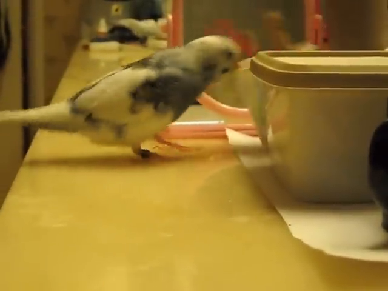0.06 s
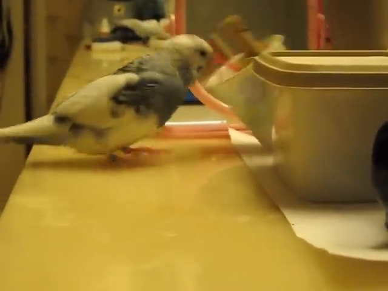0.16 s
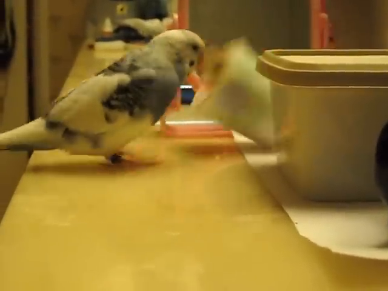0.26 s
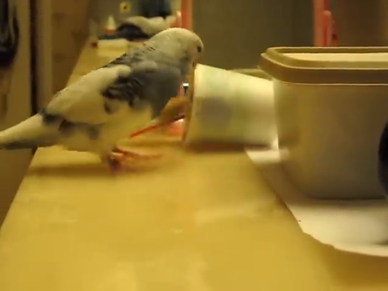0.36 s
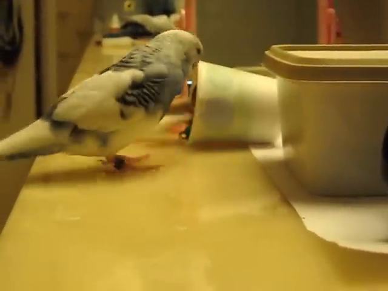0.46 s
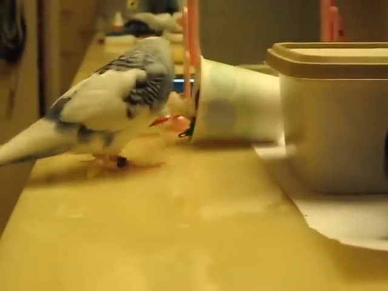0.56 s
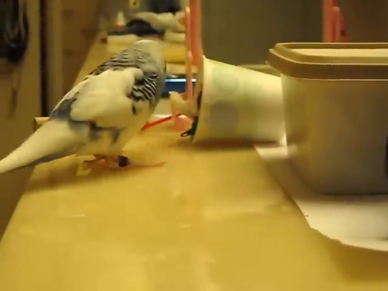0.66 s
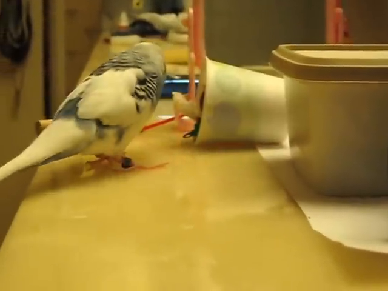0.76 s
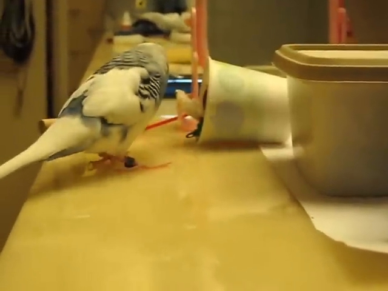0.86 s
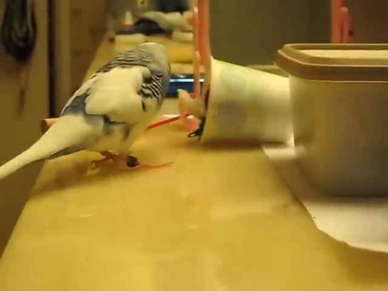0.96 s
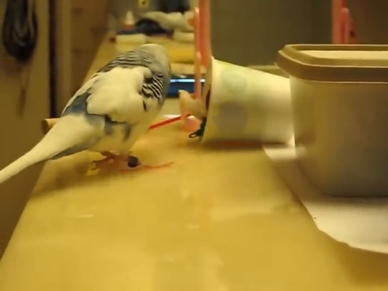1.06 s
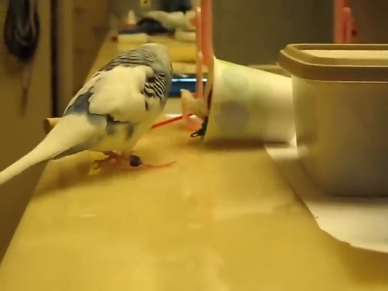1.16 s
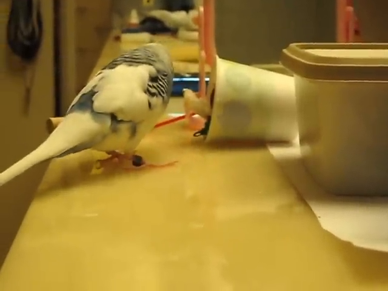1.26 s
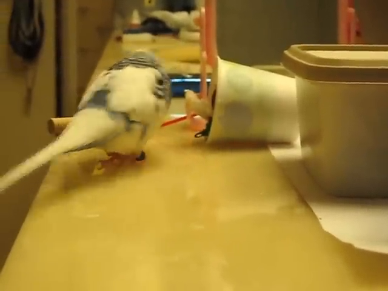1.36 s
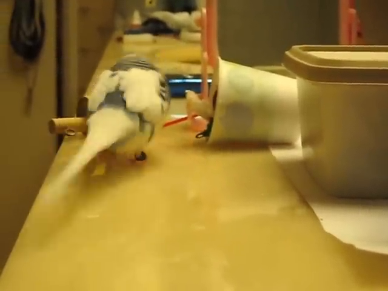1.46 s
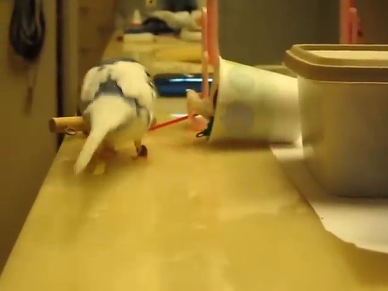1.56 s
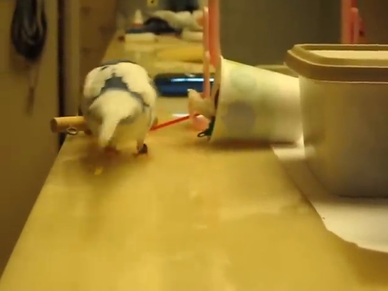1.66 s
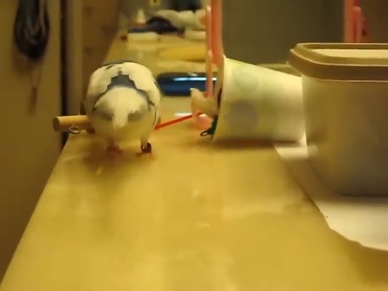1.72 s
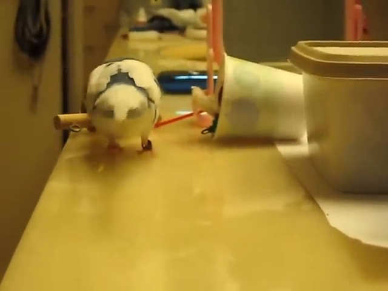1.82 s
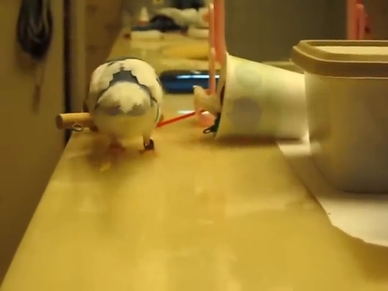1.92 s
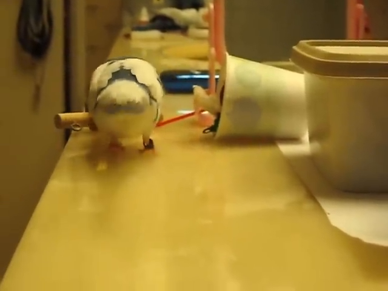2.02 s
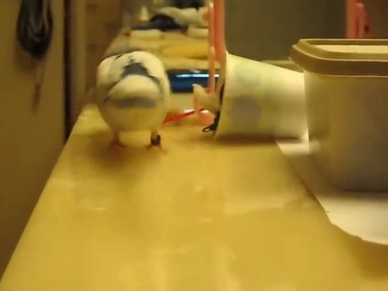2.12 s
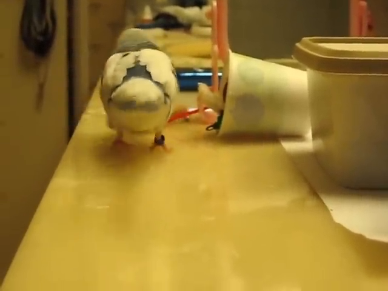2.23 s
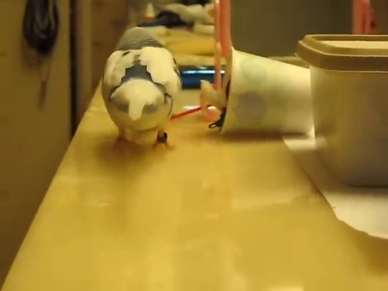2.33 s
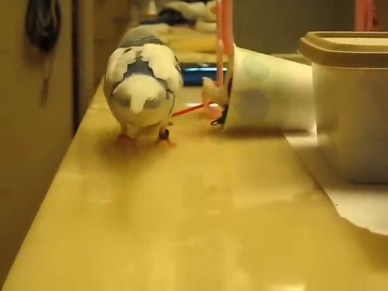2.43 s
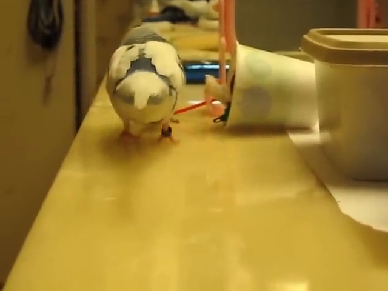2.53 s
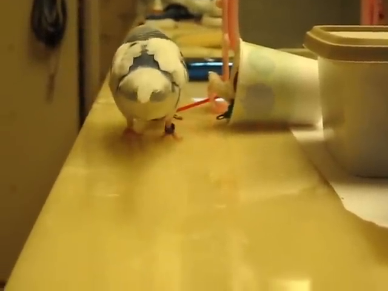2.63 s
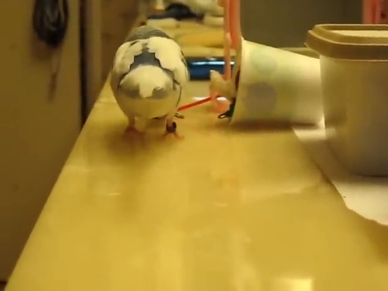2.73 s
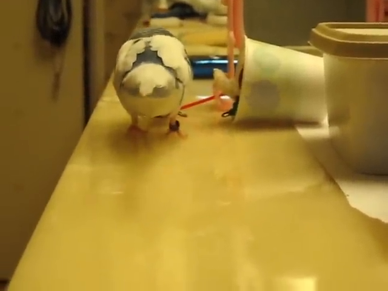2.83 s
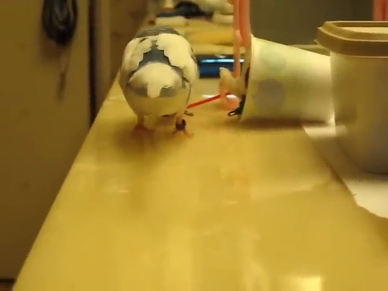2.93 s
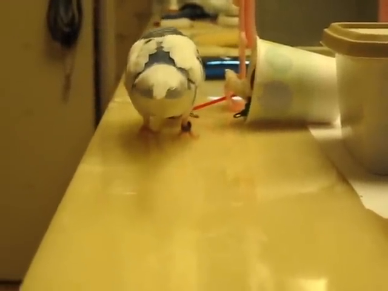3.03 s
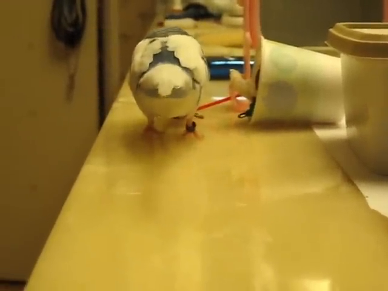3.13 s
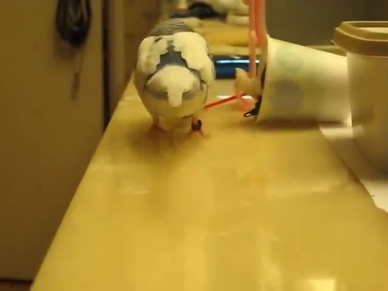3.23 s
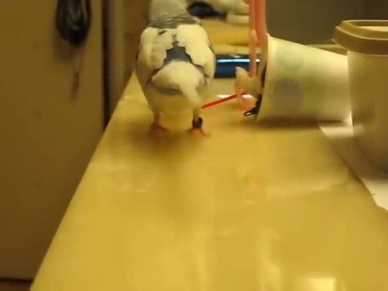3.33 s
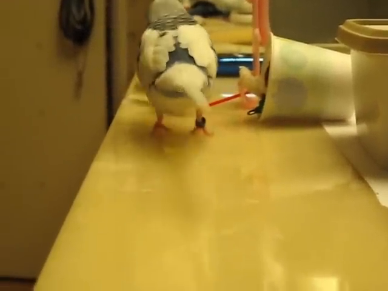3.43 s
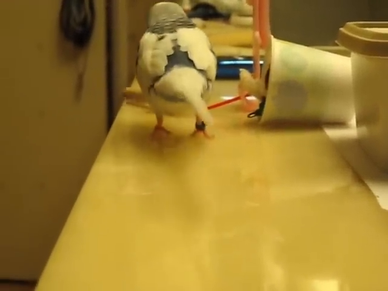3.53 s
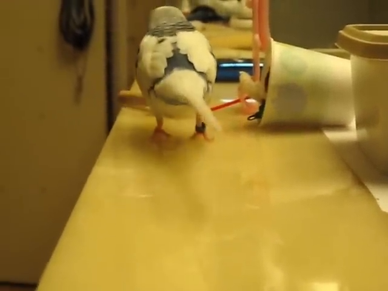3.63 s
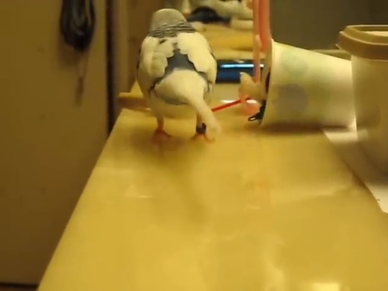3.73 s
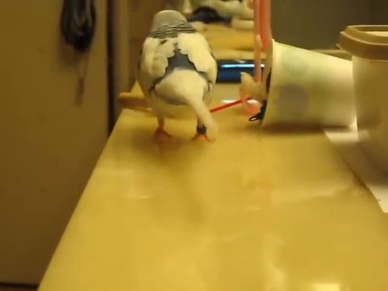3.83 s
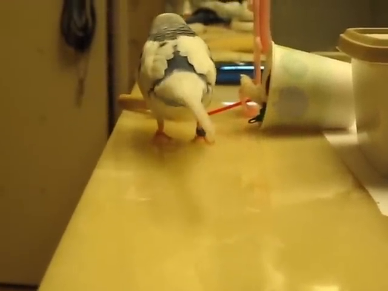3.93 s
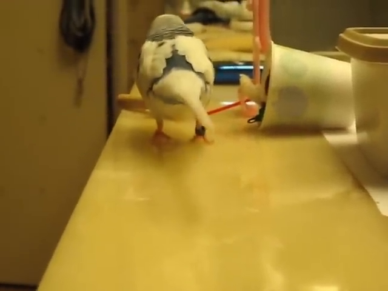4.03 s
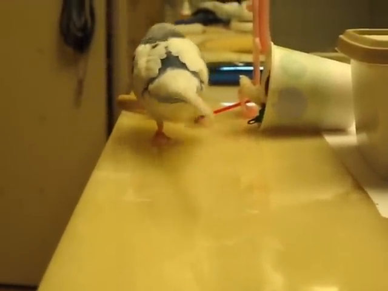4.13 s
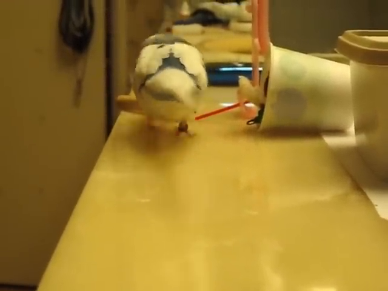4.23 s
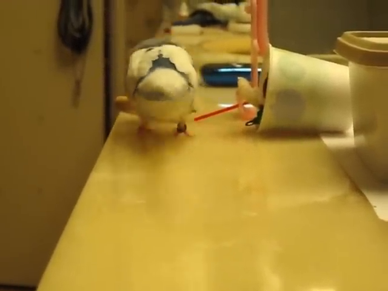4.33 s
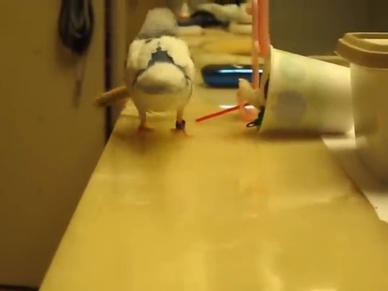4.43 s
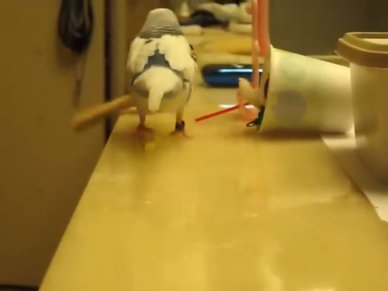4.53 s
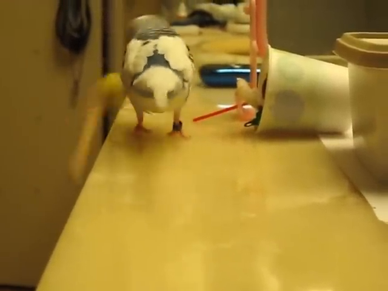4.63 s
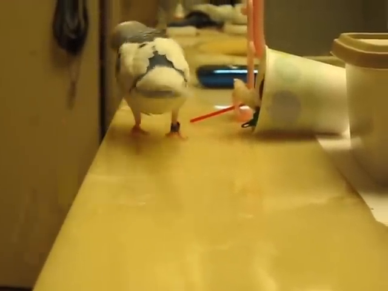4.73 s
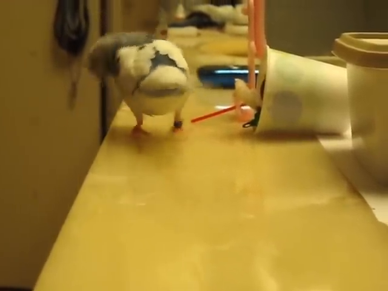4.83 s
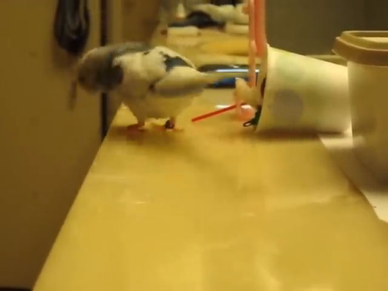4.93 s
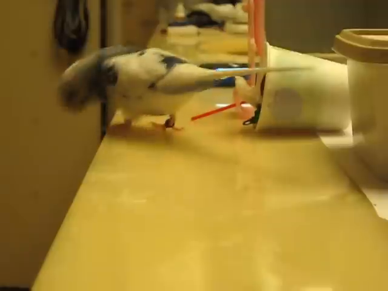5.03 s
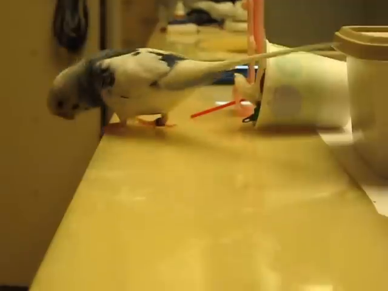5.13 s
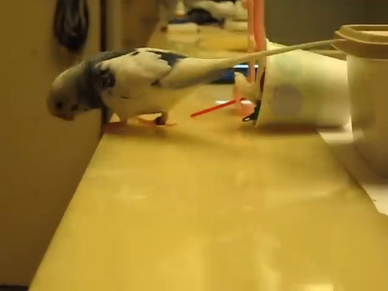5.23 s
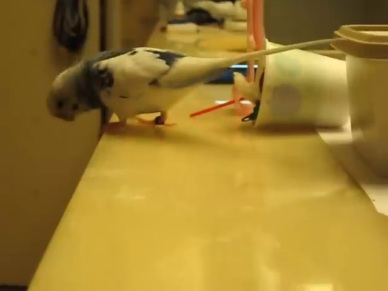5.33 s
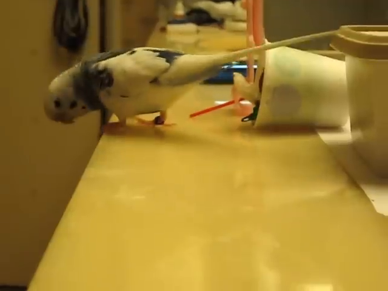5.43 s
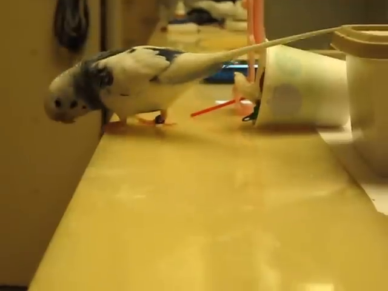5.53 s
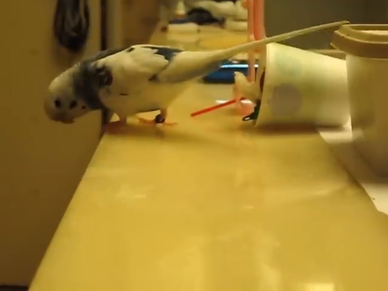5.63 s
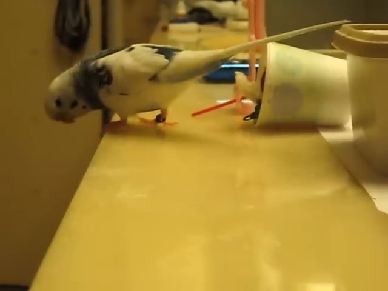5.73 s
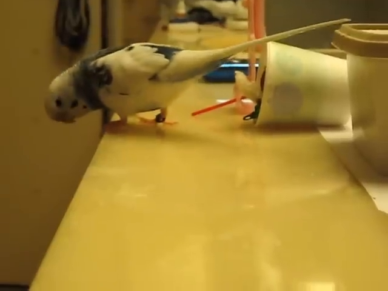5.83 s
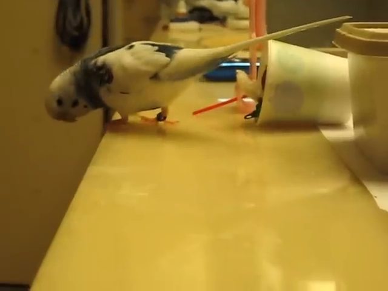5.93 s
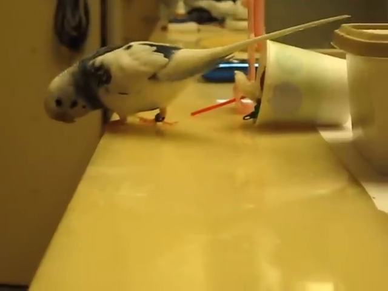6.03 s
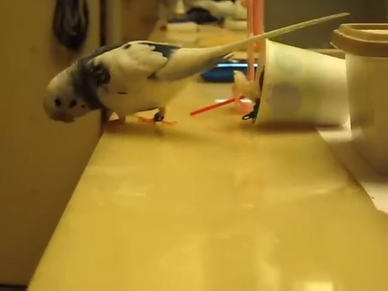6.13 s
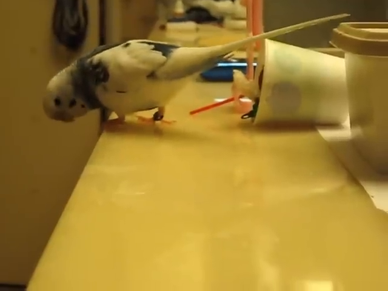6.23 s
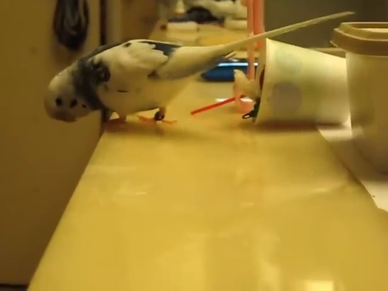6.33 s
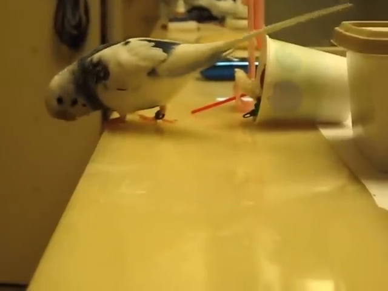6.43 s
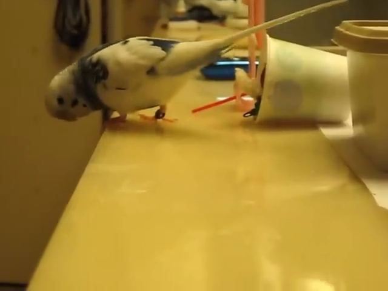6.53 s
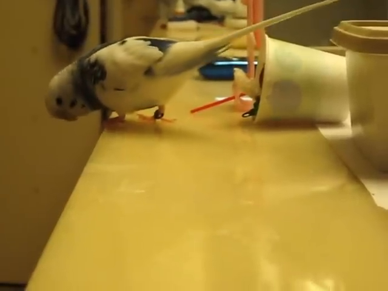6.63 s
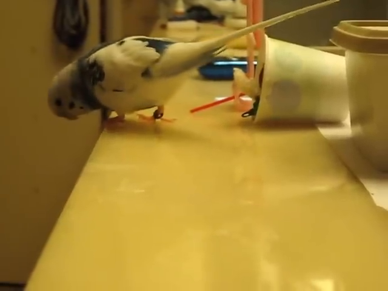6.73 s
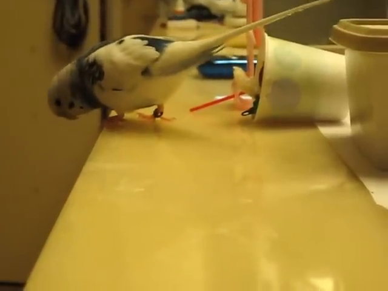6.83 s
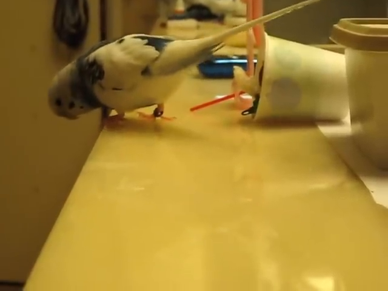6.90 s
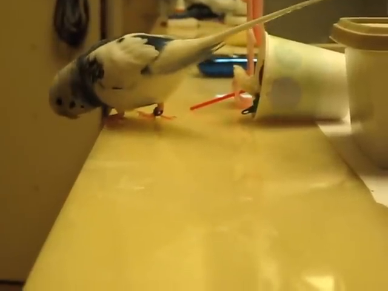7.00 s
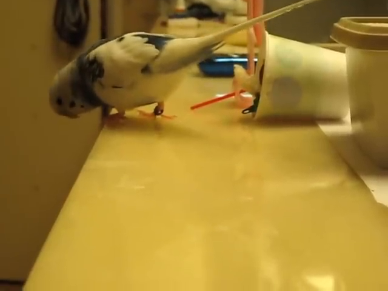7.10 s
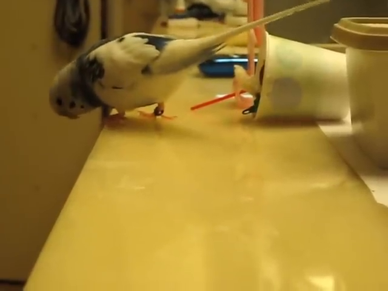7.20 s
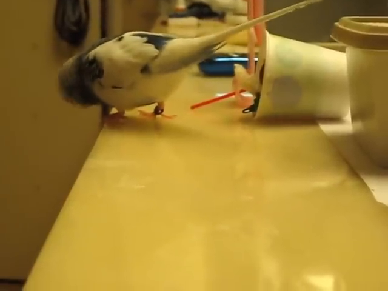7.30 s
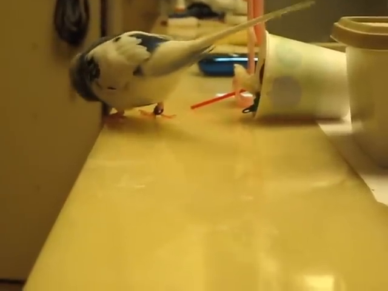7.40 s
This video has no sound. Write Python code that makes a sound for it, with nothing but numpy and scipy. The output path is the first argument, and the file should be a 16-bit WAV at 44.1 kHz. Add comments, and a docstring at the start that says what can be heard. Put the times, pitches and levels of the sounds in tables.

```python
"""On a kitchen counter, a budgie tips a paper cup of toys, drags a wooden peg with a jingle bell
and drops it over the edge. Decaying sines make the bell and a metal trinket ring; peg, cup and claws knock
with short clicks that ring the wood, and things slide, roll and squeak. Tail feathers brush across
the cup as shaped noise; a small microphone hisses under a faint mains hum."""
import sys
import numpy as np
from scipy import signal
from scipy.fft import rfft, irfft
from scipy.io import wavfile
from scipy.ndimage import uniform_filter1d

SR = 44100
rng = np.random.default_rng(int(sys.argv[2]) if len(sys.argv) > 2 else 0)


def boost_factor(decibels):
    """Convert a level in decibels to a linear amplitude factor."""
    exponent = np.asarray(decibels, float) / 20
    return 10 ** exponent


def store_wav(level_fs):
    """Save 16-bit WAV to argv[1]."""
    pcm = np.round(np.clip(np.atleast_2d(level_fs), -1, 1) * 32767)
    wavfile.write(sys.argv[1], SR, pcm.T.astype(np.int16))


N = 328986
TIME = np.arange(N) / SR

# Ringing tones of worktop, peg and cup: pitch_hz, level_db, t60_s (time to fade by 60 dB)
WOOD_MODES = [(780, -3, 0.061), (860, -5.5, 0.13), (980, -4.5, 0.061), (1214.5, 0.5, 0.042),
              (1522, -2.5, 0.026), (1750, -8, 0.16), (2150, -5, 0.16), (2430, -9, 0.1), (2680, -3.5, 0.057),
              (3000, 1, 0.024), (3630, -11, 0.016), (4270, -18, 0.045)]


def unit(x):
    """Scale to rms 1."""
    return x / np.sqrt(np.mean(x ** 2))


def colour(x, points):
    """Filter by (Hz, dB) points joined on a log-frequency axis; rms 1."""
    hz, db = np.transpose(points)
    bins = np.fft.rfftfreq(N, 1 / SR) + 1  # the 1 avoids log(0)
    gain = boost_factor(np.interp(np.log(bins), np.log(hz), db))
    return unit(irfft(rfft(x) * gain, N))


def band(x, lo_hz, hi_hz, order=2):
    """Butterworth band-pass."""
    return signal.sosfilt(signal.butter(order, [lo_hz, hi_hz], "band", fs=SR, output="sos"), x)


def mode(x, hz, t60):
    """One decaying sine for every impulse in x."""
    r = np.exp(-np.log(1000) / (t60 * SR))
    w = 2 * np.pi * hz / SR
    return signal.lfilter([0, np.sin(w)], [1, -2 * r * np.cos(w), r * r], x)


def train(times, sizes):
    """Impulses of the given sizes at the given seconds."""
    out = np.zeros(N)
    np.add.at(out, (np.asarray(times) * SR).astype(int), sizes)
    return out


def grains(rate, spread_db):
    """Random tiny impacts, rate per second, a few much stronger than the rest; rms 1."""
    hit = rng.random(N) < rate / SR
    strength = boost_factor(spread_db * np.minimum(rng.exponential(size=N), 4.0))
    return unit(hit * strength * rng.choice([-1, 1], N))


def walk(rate):
    """Smooth random wander, faster for a higher rate; rms 1."""
    k = int(SR / rate)
    return unit(uniform_filter1d(uniform_filter1d(rng.standard_normal(N), k), k))


def swell(s, held, db, rise, fall):
    """Gain that rises to db at s, holds and falls, at steady dB per second."""
    below_db = np.maximum(rise * (s - TIME), fall * (TIME - s - held))
    return boost_factor(db - np.maximum(0, below_db))


def hum():
    """Mains hum from an appliance: steady tones, each made to waver by narrow noise around it."""
    # Tones of the hum: pitch_hz, level_db, width_hz of the noise
    hum_tones = [(114, -80, 8), (178, -87.5, 8), (240, -67, 5), (358.6, -71, 6), (418, -81, 10),
                 (550, -83, 10), (605, -83.5, 6), (734, -79.5, 6)]
    out = 0
    for hz, db, width in hum_tones:
        noise = band(rng.standard_normal(N), hz - width / 2, hz + width / 2, order=1)
        waver = noise * .5 * np.sqrt(hz / width)
        out = out + boost_factor(db) * unit(waver + np.sin(2 * np.pi * hz * TIME))
    return out


def wood(push):
    """The worktop's modes; push(k) gives the force on mode k, and the contact is too soft for treble."""
    ring = sum(boost_factor(db) * mode(push(k), hz, t60) for k, (hz, db, t60) in enumerate(WOOD_MODES))
    return band(ring, 360, 4700)


def slides():
    """Sliding and rocking: dense small impacts ring the wood; the paper cup crackles above."""
    # Pushes along the worktop: start_s, held_s, level_db, crackle_db (relative to the level)
    pushes = [(.012, .012, -49, -3), (.08, 0.14, -57.5, -11), (0.406, 0.041, -37.5, 0),
              (0.466, 0.019, -35, 1.5), (0.531, 0.036, -42.5, -12), (.595, 0.024, -50, -11),
              (0.691, 0.033, -42.5, -11), (.81, 0.11, -51.5, -27), (.99, 0.032, -57, -30),
              (2.248, 0.036, -42.5, -16), (2.304, 0.031, -41, -21), (3.438, 0.008, -30, -14.5),
              (3.534, 0.039, -35.5, -17), (3.621, .11, -41, -8), (4.569, 0.065, -28.5, -25)]
    rise_db_per_s, fall_db_per_s = 20000, 231
    thuds = colour(grains(2500, 4.5), [(250, -14.5), (700, -7.5), (1500, -1.5), (2600, -11.0),
                                       (4500, -14), (8000, -45)])
    rumble = 0.66 * unit(wood(lambda k: grains(1500, 3.8))) + 0.59 * thuds
    crackle = colour(grains(4000, 8.1), [(2500, -26), (3800, 8), (7000, 1), (9000, -10), (16000, -11)])
    out = 0
    for s, held, db, crackle_db in pushes:
        gain = swell(s, held, db, rise_db_per_s, fall_db_per_s)
        out = out + gain * (rumble + boost_factor(crackle_db) * crackle)
    return boost_factor(0.76 * walk(76)) * out  # uneven in strength


def knocks():
    """A short pitched click with a rough tail, a broadband edge, and the wood ringing after."""
    # Knocks of peg, cup and claws: start_s, level_db, pitch_hz of the click, edge_db (relative)
    knock_list = [(0.0149, -29.5, 1620, -4), (0.0154, -31, 4300, -5), (0.0204, -34, 1900, -12),
                  (0.0806, -33, 1060, -10.5), (0.089, -31.5, 1170, -36), (0.1753, -41, 1610, -13),
                  (0.2045, -36.5, 2520, 0.5), (0.394, -30, 2050, -8), (0.4033, -14, 1750, -7.5),
                  (0.4034, -9.5, 4030, 0), (0.418, -20, 1250, -9), (0.467, -22.5, 2530, 1.5),
                  (0.4787, -21, 2200, -13), (0.4945, -18.5, 3600, 6), (0.495, -16, 11860, -4),
                  (0.529, -25, 3120, 7), (0.5299, -14.5, 12000, -5), (0.5927, -17.5, 2050, -26),
                  (0.6205, -19.5, 2350, -36), (0.626, -25.5, 2100, -36), (0.6313, -19.5, 1960, -40.5),
                  (0.6821, -15.5, 2130, -23), (0.701, -24, 3340, -14), (0.745, -19, 2470, -17),
                  (0.7543, -32, 2120, -33), (0.8243, -26.5, 2300, -15), (0.8504, -18, 2150, -30),
                  (0.883, -46, 1190, -36), (0.89, -33, 1440, -32), (0.9928, -34.5, 1750, -30),
                  (1.0212, -39, 1770, -21), (1.048, -49, 2150, -27), (1.064, -40.5, 2210, -25),
                  (1.0863, -41.5, 960, -26), (2.0715, -45, 3000, -20), (2.0946, -41, 2560, -9),
                  (2.2495, -28.5, 860, -30), (2.2502, -30, 3300, -15), (2.2513, -26, 2150, -9),
                  (2.264, -27, 910, -28), (2.2864, -27.5, 820, -25), (2.289, -32, 2700, -20),
                  (2.323, -38, 1250, -36), (3.3718, -51, 2430, 5), (3.435, -23.5, 1740, -21),
                  (3.4351, -16, 3550, -28), (3.4526, -23, 1460, -36), (3.4744, -27, 2770, -7),
                  (3.537, -29, 1150, -5), (3.5722, -24.5, 1800, -9), (3.6702, -23, 3850, -20),
                  (3.6711, -24, 1470, -30), (3.7607, -20, 2330, -24), (3.765, -18.5, 2430, -29),
                  (3.8539, -34.5, 2405, -39), (3.8818, -48, 2300, -23), (3.8924, -39, 1070, -24),
                  (3.993, -51, 2740, -25), (4.393, -40, 2360, -6), (4.5706, -12, 1670, -19),
                  (4.5698, -9.5, 3600, -31), (4.5887, -13, 2100, -30), (4.625, -19.5, 1220, -32),
                  (4.65, -27, 1610, -36), (4.686, -20.5, 1374, -25), (4.7196, -21, 1610, -32),
                  (4.7572, -28.5, 2620, -23), (4.7839, -27.5, 1470, -28), (4.785, -35, 3500, -20),
                  (4.7922, -33, 1570, -34), (4.81, -27.5, 1920, -22), (4.9164, -32, 2460, 6),
                  (5.0631, -24, 2000, -5), (5.128, -19, 2280, -13), (5.141, -20, 2510, -7),
                  (5.1806, -20, 1520, -15), (5.1808, -14.5, 2760, -20), (5.1936, -22, 2820, -8),
                  (5.2343, -16, 2400, -19), (5.2704, -24.5, 2160, -15), (5.2938, -32, 2090, -36),
                  (5.3687, -27, 2570, -24), (5.4535, -31.5, 1750, -25), (6.35, -47, 980, -22),
                  (6.37, -45, 5150, 8), (6.5119, -46.5, 860, -19), (6.5836, -34.5, 2330, -27),
                  (6.59, -34, 2630, -30), (6.5998, -40, 2200, -22), (6.9748, -51, 5450, 18.5),
                  (6.985, -46, 14300, -15), (6.993, -48, 13600, -12)]
    s, db, hz, edge_db = np.transpose(knock_list)
    over = db + 25  # dB above a middling knock
    # higher knocks fade sooner, harder ones slightly later
    base_t60 = 0.019 * (hz / 2000) ** -0.65 * boost_factor(0.01 * over)
    out, t = np.zeros(N + SR), np.arange(SR // 10) / SR
    chance = rng.standard_normal((len(s), len(t)))
    for k in range(len(s)):
        onset = np.sin(np.pi / 2 * np.minimum(t / 0.00049, 1)) ** 2
        fade = np.exp(-np.log(1000) * t / base_t60[k]) * onset
        rough = unit(band(chance[k], hz[k] / 1.21, hz[k] * 1.21))
        # the powers shorten the fade, more for the edge than for the click
        click = (np.sin(2 * np.pi * hz[k] * t) + 0.84 * rough) * fade ** 1.54
        hard = band(band(chance[k][::-1], 4400, 19845), 2200, 6600, order=1)
        edge = boost_factor(edge_db[k]) * unit(hard) * fade ** 1.95
        out[int(s[k] * SR):][:len(t)] += boost_factor(db[k]) * (click + edge)
    # each knock lands on another spot; hard ones ring relatively less
    spot = rng.standard_normal((len(s), len(WOOD_MODES)))
    ring_db = -47.5 + 0.64 * over

    def push(k):
        """Force of all knocks on one wood mode, with random share and sign."""
        return train(s, boost_factor(ring_db + 2.6 * spot[:, k]) * np.sign(spot[:, k - 1]))

    return out[:N] + wood(push)


def trinket():
    """A smaller metal trinket in the cup: two close low modes and one high one."""
    # Ringing tones: pitch_hz, level_db, t60_s
    trinket_modes = [(4300, -6, .09), (4370, -9, .06), (12700, -4, .15)]
    # Strikes: start_s, level_db, high_db (extra on the high mode)
    tinks = [(.1256, -44.5, -24), (0.203, -38, -22), (0.238, -42, -11), (.2524, -53, -11),
             (0.4197, -31, -6), (0.4313, -24, -1), (0.451, -37, -1)]
    s, db, high_db = np.transpose(tinks)
    out = 0
    for k, (hz, mode_db, t60) in enumerate(trinket_modes):
        strike_db = db + mode_db + high_db * (k == 2)
        out = out + mode(train(s, boost_factor(strike_db)), hz, t60)
    return out


def bell():
    """Each strike lands on another spot; the pellet skitters on and chokes the ring unevenly."""
    # Ringing tones of the jingle bell on the peg: pitch_hz, level_db, t60_s
    bell_modes = [(3486, -5.5, 0.048), (3850, -19, 0.087), (4754, -14.5, 0.064), (4974, -10, 0.15),
                  (6090, -20, 0.091), (6240, 1.5, 0.054), (6370, -26, 0.082), (6670, -11, 0.087),
                  (6600, -36, .04), (8830, -25.5, 0.097), (10760, -23.5, 0.081), (12960, -13.5, 0.085),
                  (13600, -19, 0.036), (13950, -10, 0.065), (14060, -21, 0.05), (14300, -14, 0.033)]
    # Pellet strikes: start_s, level_db, then extras low_db (two lowest modes),
    # middle_db (5 kHz mode), high_db (modes above 8 kHz)
    jingles = [(0.4675, -22.5, 3, -7, -6), (0.472, -34, 3, 6, -4), (0.4945, -21.5, -2, -1, -10),
               (0.5303, -27.5, 5, 3, -8), (0.7008, -27.5, 6.5, -3, -9), (0.733, -38.5, -14, -2, -3),
               (0.7726, -27, -3, 1, -7), (0.8047, -31.5, -5, -11, -3), (0.8144, -30, -4, 0, -8),
               (0.9312, -32, -6, -1, -10), (2.1031, -45.5, 3.5, 10, -18), (2.2162, -33, -3, -2, -6),
               (2.2246, -33.5, -7, 1, -15), (2.2672, -27.5, -16, -2, -12), (2.3116, -22, -0.5, -2, 1),
               (2.3267, -22.5, -7, -10, 0.5), (2.359, -25, 3, -3, 0.5), (2.3754, -23.5, -1, 5, -1),
               (2.39, -37, -15, 12, 8), (2.4779, -45, 1, 7, -11.5), (3.4356, -23, 4.5, 3, -15),
               (3.473, -26, 8, 11.5, 12), (3.5329, -19.5, -2, -3, 2), (3.5594, -39, 11, 17.5, 7),
               (3.6202, -17, -5, -21, -2.5), (3.6501, -25.5, -0.5, -5, 2), (3.7146, -18.5, -6.5, -14, -5),
               (3.7394, -30, -16, -13, 0.5), (3.7874, -34, -17, 0, -18), (4.424, -29.5, -7, -8, -4.5),
               (4.4397, -31.5, -22, -5, -11), (4.5186, -39.5, 0, -13, -19), (4.571, -33, 22, 3, 6),
               (4.581, -32, 4, 20, -16), (4.6298, -34, -8, 10, -15), (4.8861, -35.5, 10, 19, -3)]
    skitter_db, skitter_s = -28, 0.014  # the pellet rattling on after a strike
    s, db, low_db, middle_db, high_db = np.transpose(jingles)
    spot = rng.standard_normal((len(s), len(bell_modes)))
    fade = np.exp(-np.arange(SR // 10) / (skitter_s * SR))
    out = 0
    for k, (hz, mode_db, t60) in enumerate(bell_modes):
        extra_db = low_db if k < 2 else middle_db if k == 3 else high_db if k > 8 else 0
        size = boost_factor(db + extra_db)
        rattle_gain = signal.fftconvolve(train(s, size), fade)[:N]
        skitter = boost_factor(skitter_db) * grains(1200, 3.1) * rattle_gain
        strikes = train(s, size * boost_factor(0.73 * spot[:, k]))
        ring = mode(strikes + skitter, hz, t60)
        choke_db = 3.5 * (hz / 6000) ** .5 * walk(420)  # higher modes flicker more
        out = out + boost_factor(mode_db - 4.5 + choke_db) * ring
    # the metal tick of contact
    tick = band(train(s, boost_factor(db + high_db)), 5900, 15000, order=1)
    return out + boost_factor(1.0) * tick


def rolls():
    """Surface bumps keep one hollow resonance going; its pitch sags and wobbles with the point of contact."""
    # The cup and later the peg rolling away: start_s, held_s, level_db, pitch_hz, sag_hz_per_s
    roll_list = [(.89, 0.15, -55.5, 882, 392), (4.689, 0.121, -42.5, 1638, 1400)]
    edge_db_per_s, wobble_share, wobble_rate = 350, 0.049, 16
    out = 0
    for s, held, db, hz, sag in roll_list:
        pitch = (hz - sag * np.clip(TIME - s, 0, held)) * (1 + wobble_share * walk(wobble_rate))
        phase = 2 * np.pi * np.cumsum(pitch) / SR
        hollow = walk(290) * np.cos(phase) + walk(260) * np.sin(phase)
        out = out + swell(s, held, db, edge_db_per_s, edge_db_per_s) * hollow
    return out


def squeak():
    """Stick-slip as something rubs and comes to rest: a slightly unsteady stack of harmonics."""
    # Path of the squeak: time_s, pitch_hz, level_db
    squeak_path = [(.9, 690, -67), (.912, 681, -46), (.93, 694, -52), (.945, 774, -57), (.965, 702, -50),
                   (.975, 700, -74)]
    s, hz, db = np.transpose(squeak_path)
    pitch = np.interp(TIME, s, hz) * (1 + 0.0086 * walk(290))
    phase = 2 * np.pi * np.cumsum(pitch) / SR
    harmonics_db = [0.5, 1, 1, -5, -13]
    stack = sum(boost_factor(part_db) * np.sin(k * phase) for k, part_db in enumerate(harmonics_db, 1))
    return boost_factor(np.interp(TIME, s, db, left=-150, right=-150)) * stack


def feathers():
    """Tail feathers on paper: barbs catch and slip many thousand times a second, in uneven bursts."""
    # Loudness of the brushing: time_s, level_db
    strokes = [(4.805, -59), (4.83, -39.5), (4.9, -40.5), (4.912, -31.5), (4.99, -31), (5.02, -30.5),
               (5.055, -31.5), (5.09, -28), (5.16, -35.5), (5.2, -29.5), (5.29, -43.5), (5.32, -39.5),
               (5.37, -50), (5.43, -53), (5.52, -73)]
    # Tone colour of the brushing: pitch_hz, level_db
    feather_colour = [(60, -39), (160, -28.5), (410, -12.5), (620, -14), (800, -7), (1700, -4), (5300, -1),
                      (7000, -9)]
    barbs = grains(14000, 3.1) * boost_factor(1.8 * walk(73))
    db = np.interp(TIME, *np.transpose(strokes), left=-150, right=-150)
    treble = boost_factor(0.3 + 0.2 * (db + 29.5))  # firmer strokes are brighter
    body = colour(barbs, feather_colour + [(9000, -42)])
    return boost_factor(db) * (body + treble * unit(band(barbs, 6400, 16800)))


def room(near):
    """Walls and cupboards answer briefly: echoes as fading noise, starting 3 ms late."""
    t60_s, level_db = 0.22, -11
    t = np.arange(SR // 2) / SR
    noise = band(rng.standard_normal(len(t)), 360, 15000, order=1)
    tail = noise * 1000. ** (-t / t60_s) * (t > .003)
    return boost_factor(level_db) * signal.fftconvolve(near, tail / np.sqrt(np.sum(tail ** 2)))[:N]


def scene():
    """Toys and bird close by, too small to make bass, with the room's answer and the hum."""
    toys = bell() + trinket() + knocks() + slides() + squeak() + rolls()
    near = band(toys, 224, 19845) + feathers()
    return (near + room(near) + hum())[None]


def microphone(dry):
    """The microphone adds hiss; its electronics leave a deep gap near 8 kHz and stop near 16 kHz."""
    # Tone colour of the hiss: pitch_hz, level_db (per Hz)
    hiss_colour = [(25, -5), (60, -1.5), (150, -0.5), (300, -1), (600, -2.5), (1200, -4), (2500, -8),
                   (5000, -11.5), (7200, -14), (9000, -15.5), (13000, -19), (16000, -20)]
    hiss_db, notch_hz, notch_width_hz, top_hz = -57.5, 7890, 1660, 15470
    hiss = colour(rng.standard_normal(N), hiss_colour)
    x = dry + boost_factor(hiss_db + .5 * walk(4.7)) * hiss  # its level drifts slowly
    x = signal.lfilter(*signal.iirnotch(notch_hz, notch_hz / notch_width_hz, SR), x)
    x = signal.lfilter(*signal.iirnotch(notch_hz, 18.0, SR), x)  # a second, narrower notch
    return signal.sosfilt(signal.ellip(6, .3, 40, top_hz, fs=SR, output="sos"), x)


def low_pass(x):
    """Removes everything above the highest recorded frequency."""
    return signal.sosfilt(signal.butter(12, 16810, fs=SR, output="sos"), x)


def record(dry):
    """The scene as the small microphone hears it and as it is stored."""
    mix = microphone(dry)
    return low_pass(mix)


dry = scene()
out = record(dry)
store_wav(out)
```